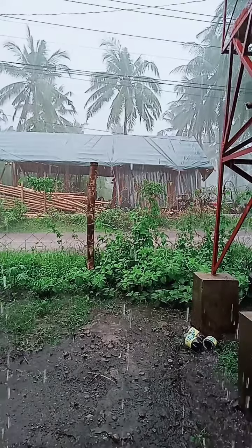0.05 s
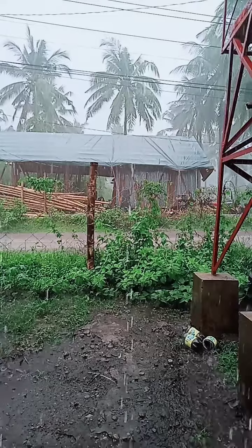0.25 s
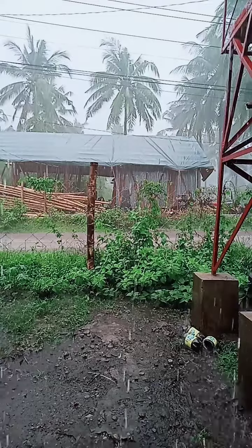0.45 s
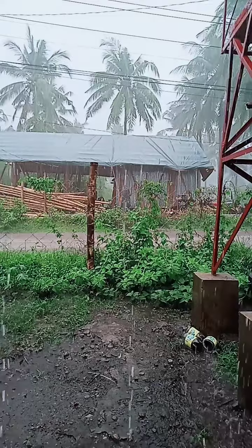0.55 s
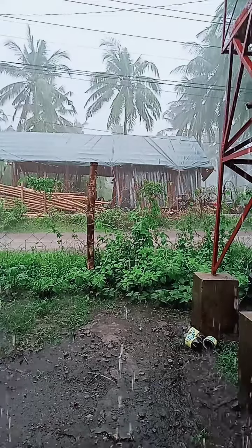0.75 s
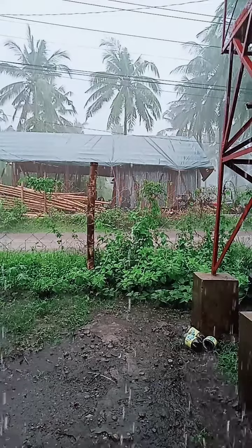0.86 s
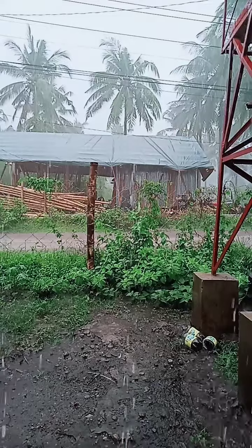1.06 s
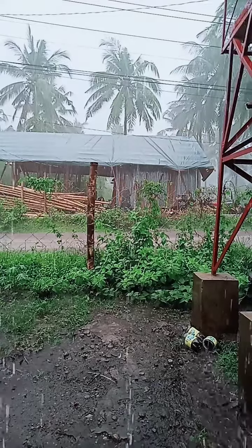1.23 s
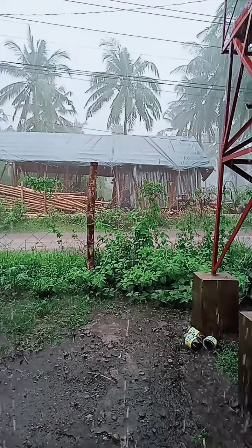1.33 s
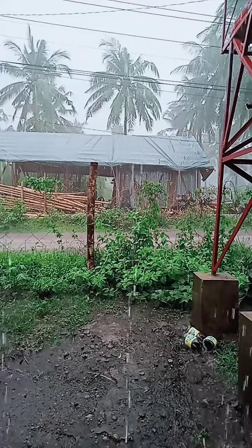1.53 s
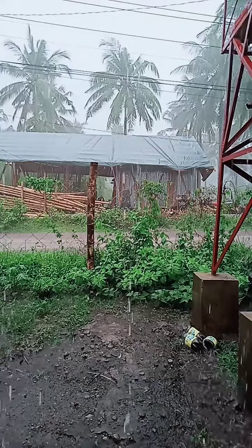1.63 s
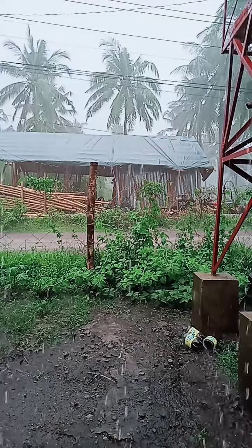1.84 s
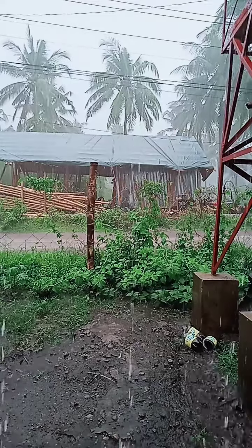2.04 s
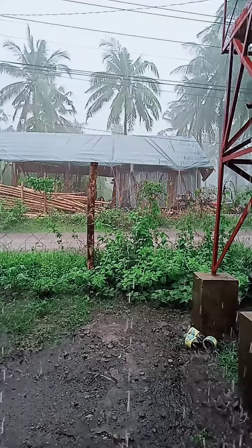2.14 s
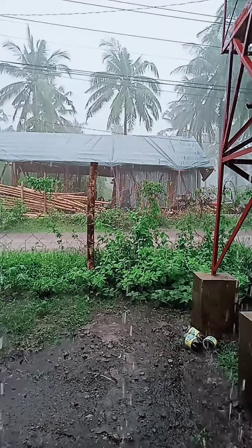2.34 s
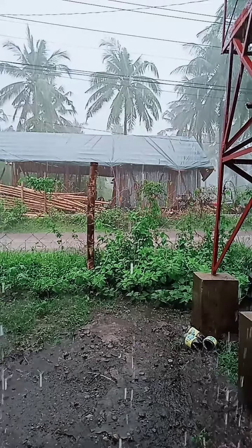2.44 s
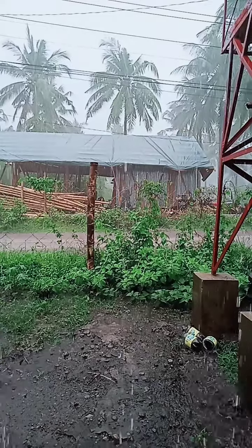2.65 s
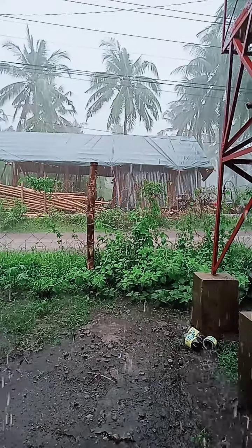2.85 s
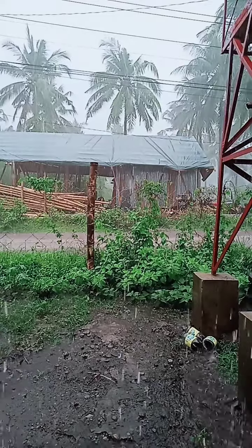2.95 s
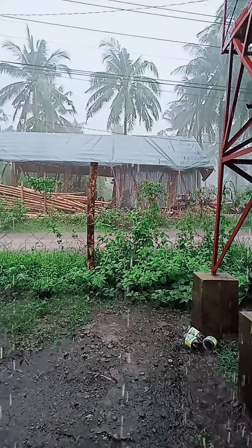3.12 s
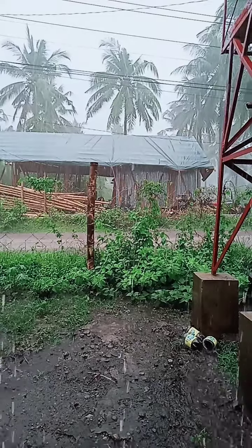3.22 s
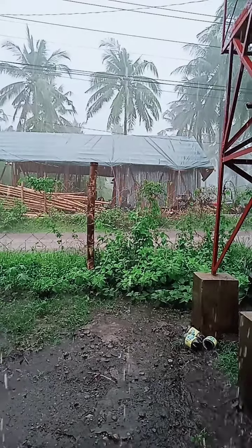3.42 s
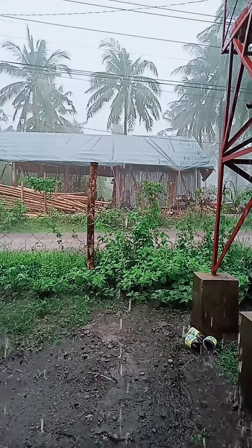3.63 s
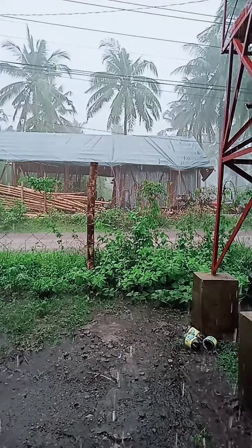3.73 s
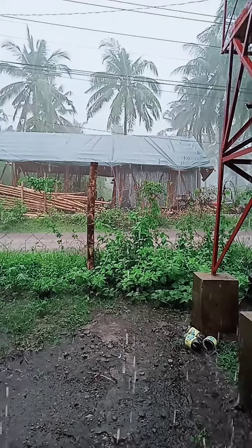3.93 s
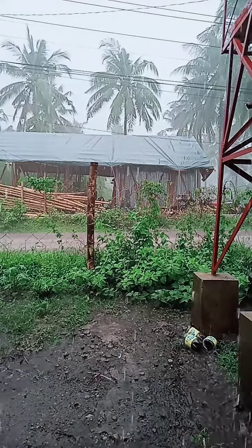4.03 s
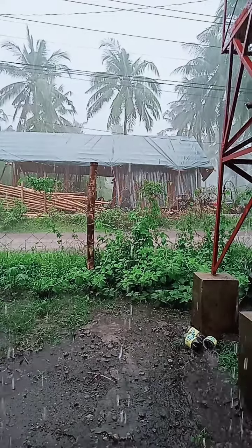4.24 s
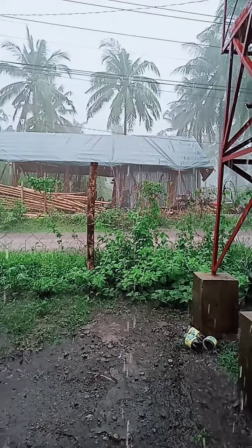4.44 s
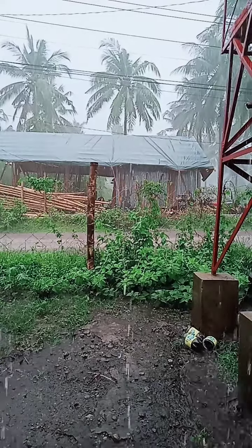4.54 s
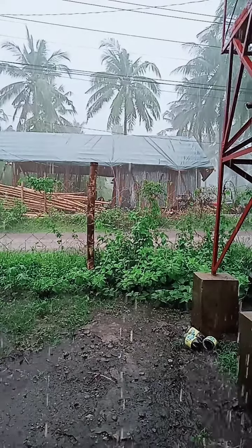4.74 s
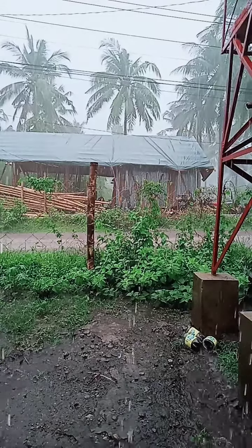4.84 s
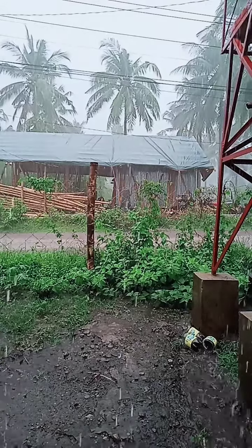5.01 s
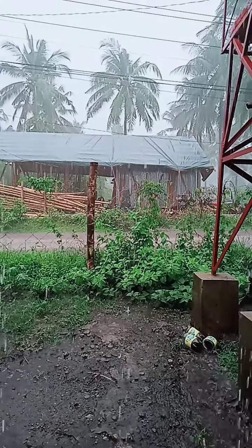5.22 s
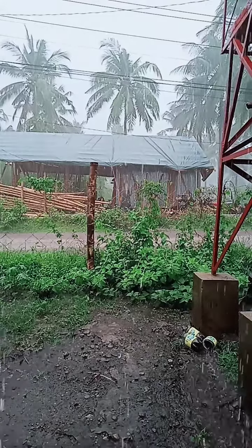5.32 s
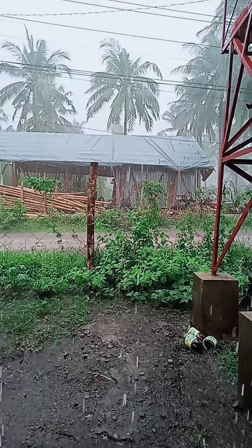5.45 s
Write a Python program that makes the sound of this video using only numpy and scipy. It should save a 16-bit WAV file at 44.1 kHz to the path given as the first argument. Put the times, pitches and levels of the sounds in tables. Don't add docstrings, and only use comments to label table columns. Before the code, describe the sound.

A continuous tropical downpour heard from beneath a metal porch roof facing a wet yard. The roof's blended roar dominates, individual impacts mostly merged; softer, brighter patter comes from muddy ground and foliage. Fine spray and sparse drip ticks are barely noticeable. Deep bass rolls swell very faintly later on. Level is almost constant, with two gentle surges past the midpoint. Mono, close, little treble, no echo.

```python
import sys
import numpy as np
from scipy import signal
from scipy.fft import rfft, irfft
from scipy.io import wavfile
from scipy.ndimage import uniform_filter1d, map_coordinates

SR = 44100
rng = np.random.default_rng(int(sys.argv[2]) if len(sys.argv) > 2 else 0)


def gain_from_db(level_db):
    decades = np.asarray(level_db, float) / 20
    return 10 ** decades


def to_wav(s):
    ch = np.atleast_2d(s).T
    pcm = np.round(np.clip(ch, -1, 1) * 32767)
    wavfile.write(sys.argv[1], SR, pcm.astype(np.int16))


N = 386316


def unit(x):
    return x / np.sqrt(np.mean(x ** 2) + 1e-20)


def hiss():
    return rng.standard_normal(N)


def wobble(rate_hz):
    knots = rng.standard_normal(N // 100)
    return map_coordinates(knots, [np.arange(N) * rate_hz / SR])


def coloured(x, spectrum, peaks=()):
    size = 8192
    hz = np.fft.rfftfreq(size, 1 / SR)
    f, level = np.transpose(spectrum)
    db = np.interp(np.log(hz + 1), np.log(f), level)
    for centre, width, lift in peaks:
        db = db + lift * np.exp(-2 * ((hz - centre) / width) ** 2)
    cepstrum = irfft(np.log(gain_from_db(db)))
    cepstrum[1:size // 2] *= 2
    cepstrum[size // 2 + 1:] = 0
    response = irfft(np.exp(rfft(cepstrum)))
    return signal.fftconvolve(x, response)[:N]


def drops(count, scatter_db, blur_s):
    when, size = rng.random((count, 2)).T
    impact_power = gain_from_db(-2 * scatter_db * np.log(1 - 0.998 * size))
    power = np.bincount((when * N).astype(int), impact_power, N)
    t = np.arange(SR // 10) / SR
    decay = gain_from_db(-120 * t / blur_s)
    envelope = np.sqrt(np.abs(signal.fftconvolve(power, decay)[:N]))
    return envelope * hiss()


def near_and_far(near, far_power):
    return unit(near) + np.sqrt(far_power) * hiss()


def patches(x, patchy_db):
    z = signal.stft(x, nperseg=512)[2]
    field = uniform_filter1d(rng.standard_normal(z.shape), size=6, axis=0)
    field = uniform_filter1d(field, size=12, axis=1)
    return signal.istft(z * gain_from_db(patchy_db * unit(field)), nperseg=512)[1][:N]


# time_s [s], level_db [dB]
POUR_STRENGTH = [
    (0.0, -0.6),
    (1.5, -0.27),
    (3.3, -0.1),
    (4.6, 0.65),
    (5.6, 0),
    (6.2, 0.55),
    (7.0, -0.3),
    (8.76, -0.5),
]


def downpour():
    time_s, level_db = np.transpose(POUR_STRENGTH)
    return np.interp(np.arange(N) / SR, time_s, level_db)


# pitch_hz [Hz], level_db [dB per Hz]
ROOF_COLOUR = [(200, -61), (400, -18.5), (550, -8.5), (740, -8), (1000, -1.5), (1800, -1.5), (2400, -3.5),
               (3000, -11), (4500, -56), (6000, -96.5)]
# pitch_hz [Hz], width_hz [Hz], lift_db [dB]
PANEL_MODES = [(642, 89, 4.5), (821, 99, 5.5), (1001, 95, 3.5), (1274, 140, 1.5), (2050, 215, 3)]


def roof(pour_db, gust):
    near = drops(count=60000, scatter_db=2.0, blur_s=0.0052)
    impacts = patches(near_and_far(near, far_power=1.44), patchy_db=0.33)
    level_db = -17.0 + pour_db + 0.25 * gust
    return gain_from_db(level_db) * unit(coloured(impacts, ROOF_COLOUR, PANEL_MODES))


# pitch_hz [Hz], level_db [dB per Hz]
YARD_COLOUR = [(1200, -61), (2200, -8), (2900, -2), (3400, 0), (4050, -3), (4600, -13), (5600, -25.5),
               (6200, -21), (6750, -22), (7300, -21.5), (8000, -30.5), (9000, -38.5), (12000, -91)]


def yard(pour_db, gust):
    near = drops(count=40000, scatter_db=2.0, blur_s=0.0031)
    impacts = patches(near_and_far(near, far_power=1.6), patchy_db=0.23)
    level_db = -27.7 + 0.38 * pour_db + 0.39 * gust
    return gain_from_db(level_db) * unit(coloured(impacts, YARD_COLOUR))


# start_s [s], level_db [peak dB]
EAVE_DRIPS = [(0.1481, -46.5), (0.6744, -48), (0.7327, -48), (1.041, -43), (1.6437, -48), (1.9669, -48),
              (2.148, -48), (2.8175, -46), (5.1078, -50), (6.318, -46), (6.4752, -50), (8.1668, -44.5),
              (8.3175, -47)]
# pitch_hz [Hz], level_db [dB per Hz]
SPRAY_COLOUR = [(5000, -51.5), (8000, -5), (9700, -2.5), (10600, -4), (11400, -1.5), (12500, -5.5),
                (13500, 0.5), (15500, -1), (17000, -5)]


def splashes():
    out = np.zeros(N + SR)
    t = np.arange(SR // 20) / SR
    for start_s, level_db in EAVE_DRIPS:
        burst = gain_from_db(level_db - 4 - 60 * t / 0.015) * rng.standard_normal(len(t))
        out[round(start_s * SR):][:len(t)] += burst
    return coloured(out, SPRAY_COLOUR)


def spray(pour_db, gust):
    near = drops(count=12000, scatter_db=3, blur_s=0.004)
    impacts = near_and_far(near, far_power=4)
    level_db = -59.3 + 0.25 * pour_db + 0.55 * gust + 0.3 * wobble(30)
    return gain_from_db(level_db) * unit(coloured(impacts, SPRAY_COLOUR))


# pitch_hz [Hz], level_db [dB per Hz]
RUMBLE_COLOUR = [(40, -70), (90, -25), (118, -12), (140, -0.5), (200, -2), (280, 0), (305, -3.5),
                 (340, -0.5), (480, -1.5), (800, -15), (1500, -56)]


def rumble(pour_db):
    far = patches(rng.standard_normal(N + 512), patchy_db=-0.35)
    return gain_from_db(-31.5 + 0.59 * pour_db) * unit(coloured(far, RUMBLE_COLOUR))


# pitch_hz [Hz], level_db [dB per Hz]
DRONE_COLOUR = [(20, -29), (35, -27), (60, -13.5), (71, -9), (82, -0.5), (95, -5), (115, -0.5), (140, -12),
                (250, -60)]
# crest_s [s], lift_db [dB]
DISTANT_ROLLS = [
    (4.2, 3),
    (6.0, 6),
    (7.35, 5.5),
]


def deep():
    rise_s, fall_s = 0.12, 0.4
    t = np.arange(N) / SR
    roll_db = np.zeros(N)
    for crest_s, lift_db in DISTANT_ROLLS:
        spread_s = np.where(t < crest_s, rise_s, fall_s)
        roll_db += lift_db * np.exp(-((t - crest_s) / spread_s) ** 2)
    return gain_from_db(-50 + roll_db) * unit(coloured(hiss(), DRONE_COLOUR))


def scene():
    pour_db = downpour()
    gust = wobble(16)
    near = roof(pour_db, gust) + yard(pour_db, gust) + splashes() + spray(pour_db, gust)
    return (near + rumble(pour_db) + deep())[None]


def low_pass(x):
    return signal.sosfilt(signal.butter(12, 15620, fs=SR, output="sos"), x)


def record(dry):
    top_hz = 15510
    spectrum = rfft(dry) * (np.fft.rfftfreq(N, 1 / SR) < top_hz)
    mix = irfft(spectrum, N)
    return low_pass(mix)


dry = scene()
out = record(dry)
to_wav(out)
```